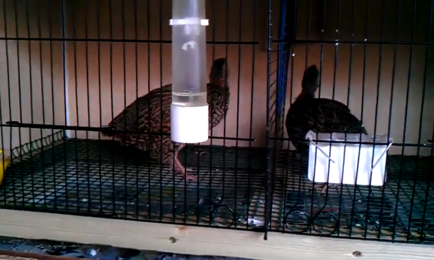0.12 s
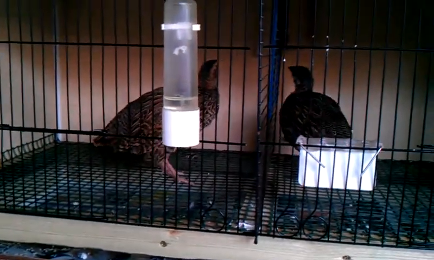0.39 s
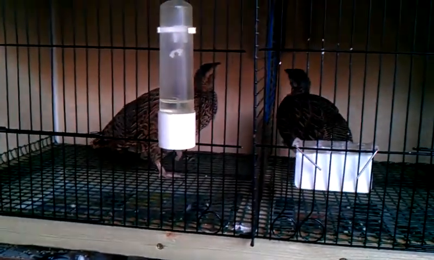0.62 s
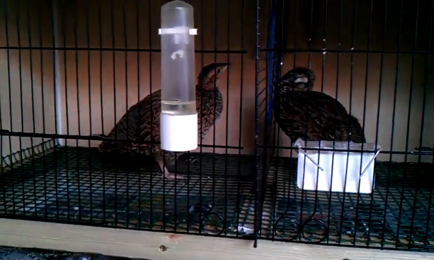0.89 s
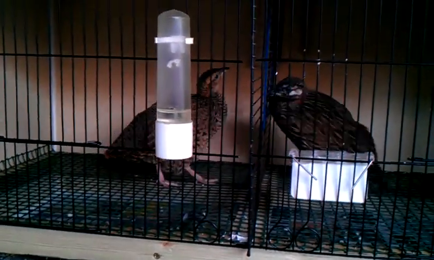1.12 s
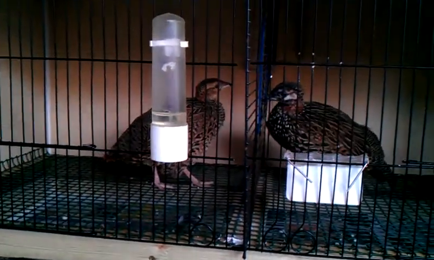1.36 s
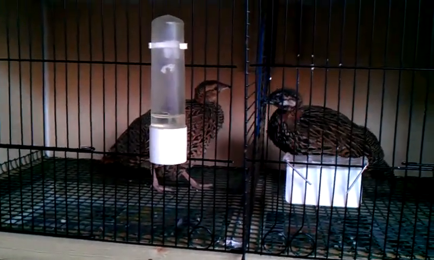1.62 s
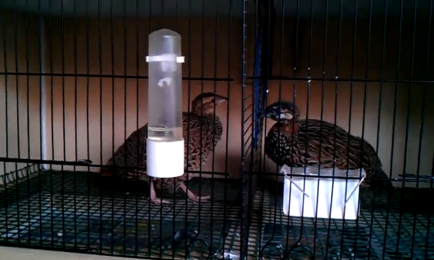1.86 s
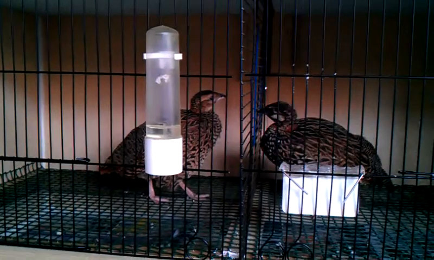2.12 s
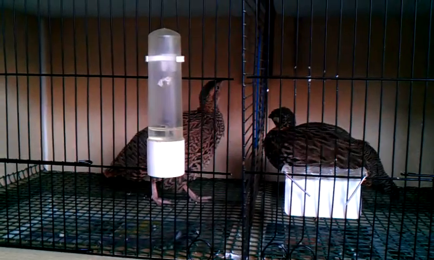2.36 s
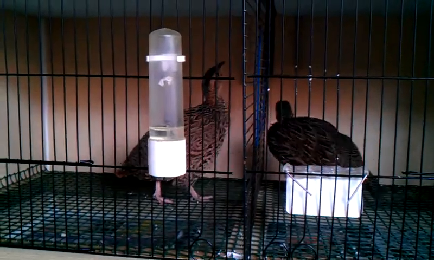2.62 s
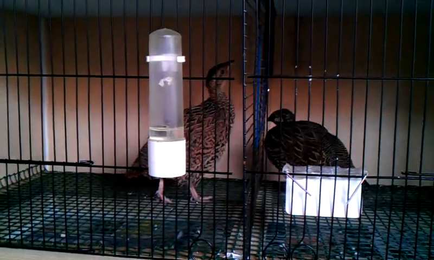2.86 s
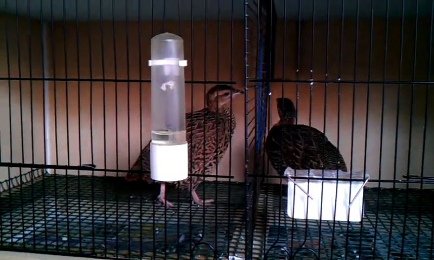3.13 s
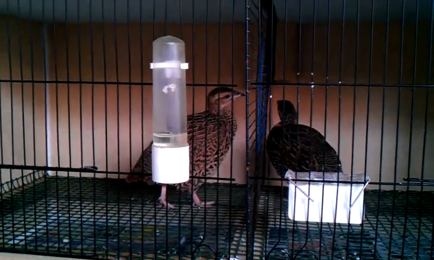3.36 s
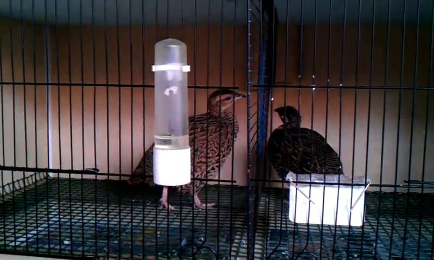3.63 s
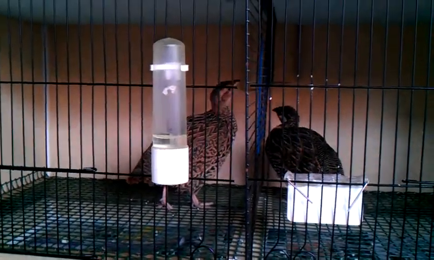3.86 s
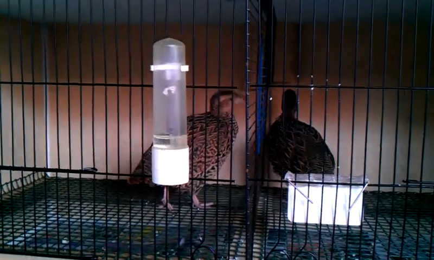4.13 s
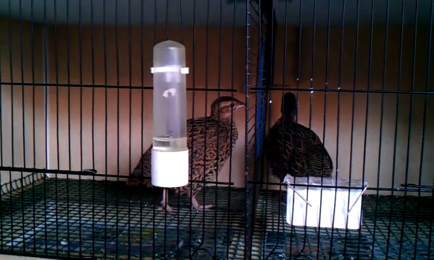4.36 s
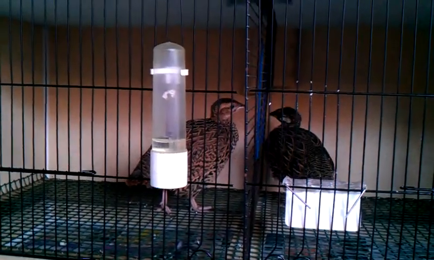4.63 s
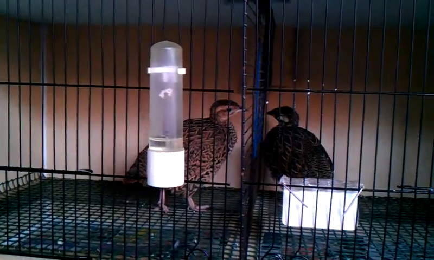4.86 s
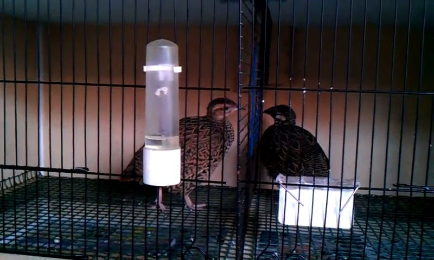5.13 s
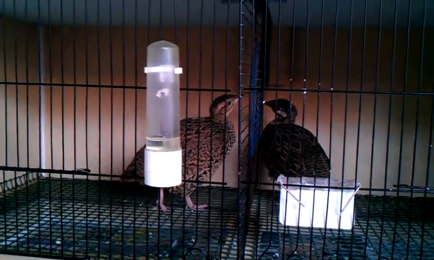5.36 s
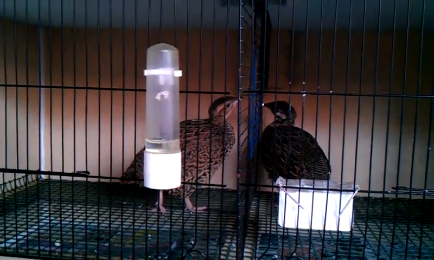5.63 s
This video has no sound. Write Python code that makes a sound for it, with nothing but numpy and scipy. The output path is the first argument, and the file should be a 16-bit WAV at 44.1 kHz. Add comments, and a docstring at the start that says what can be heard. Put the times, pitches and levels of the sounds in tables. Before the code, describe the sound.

Over faint steady room hush, feathers rustle and claws scratch mesh while a bird whimpers barely audibly. A short throaty whine leads into a loud, grating, fast rhythmic call, distorted at the input, interleaved with hoarse puffing clucks. Then near quiet returns, with a falling whimper, a few scratches, and wavering low whines at the end. Mono, close, small reverberant shed.

```python
"""A small wooden shed, with two game birds in a wire cage. One screams a rapid, rasping call, built from
fluttering partials and bursts of noise, that overloads the recorder's input; the other clucks in hoarse
puffs between phrases. Soft, mostly falling whimpers and wheezy peeps, also made of partials, come before
and after. Coloured noise gives the feathers, bodies and claws that rustle on the mesh, and the faint room."""
import sys
import numpy as np
from scipy import signal
from scipy.fft import rfft, irfft, next_fast_len
from scipy.io import wavfile
from scipy.ndimage import uniform_filter1d, map_coordinates

SR = 44100
rng = np.random.default_rng(int(sys.argv[2]) if len(sys.argv) > 2 else 0)


def store_pcm(level_fs):
    """Save levels as 16-bit WAV."""
    pcm = np.round(np.clip(level_fs, -1, 1) * 32767).astype(np.int16)
    wavfile.write(sys.argv[1], SR, np.atleast_2d(pcm).T)


def ratio_of_db(decibels):
    """Turn decibels (scalar or array-like) into linear amplitude factors; 0 dB maps to 1."""
    return 10 ** (np.asarray(decibels, float) / 20)


N = 253134
TIME = np.arange(N) / SR

# Toneless rasping while the throat breaks up. Each row: start and end in seconds, level in dB before
# the mix, beak resonance in Hz.
RASP_BURSTS = [(1.266, 1.354, -42, 8140), (1.515, 1.58, -20.5, 7800), (1.629, 1.733, -15.5, 7400),
               (1.747, 1.775, -8, 5100), (1.785, 1.84, -28.5, 4900), (1.923, 1.951, -26.5, 5150),
               (2.058, 2.139, -16.5, 8100), (2.194, 2.227, -14.5, 7160), (2.237, 2.342, -15.5, 5160),
               (2.361, 2.404, -23.5, 4840), (2.499, 2.547, -22, 5300), (2.617, 2.646, -24, 5300),
               (2.645, 2.718, -10.5, 7970), (2.763, 2.935, -14.5, 5370), (2.945, 3.005, -20.5, 4650),
               (3.102, 3.163, -22, 5200), (3.218, 3.248, -19.5, 5300), (3.248, 3.313, -11, 8140),
               (3.356, 3.419, -7, 6260), (3.467, 3.534, -21, 7200), (3.597, 3.683, -15, 4900),
               (3.665, 3.764, -19, 4680), (3.834, 3.921, -11.5, 7980), (3.956, 4.015, -15.5, 5940),
               (4.036, 4.101, -6, 7100), (4.14, 4.22, -26, 7100)]


def unit(x):
    """Scaled to rms 1."""
    return x / np.sqrt(np.mean(np.abs(x) ** 2) + 1e-20)


def along(points, hz):
    """Reads a curve of (Hz, value) points on a log frequency axis."""
    f, v = np.transpose(points)
    return np.interp(np.log(hz + 1), np.log(f + 1), v)


def wobble(rate, size):
    """A smooth random curve with rate knots a second."""
    knots = rng.standard_normal(int(size * rate / SR) + 4)
    return map_coordinates(knots, [np.arange(size) * rate / SR])


def noise(spectrum):
    """Noise of rms 1 with the given colour."""
    m = next_fast_len(N)
    white = rfft(rng.standard_normal(m))
    colour = ratio_of_db(along(spectrum, np.fft.rfftfreq(m, 1 / SR)))
    return unit(irfft(white * colour, m)[:N])


def gate(t, length, edge):
    """Opens at 0 and shuts at length, with soft edges (all in seconds)."""
    return np.sin(np.pi / 2 * np.clip(np.minimum(t, length - t) / edge, 0, 1)) ** 2


def add_voice(track, start, pitch, partials, jitter, rough, flutter_hz):
    """Adds partials {order: gain} on an unsteady pitch, each fluttering on its own, the higher ones more."""
    n = len(pitch)
    phase = 2 * np.pi * np.cumsum(pitch * (1 + jitter * wobble(flutter_hz, n))) / SR
    for k, gain in partials.items():
        # a complex flutter shakes both loudness and phase
        flutter = 1 + rough * k ** 0.25 * (wobble(flutter_hz, n) + 1j * wobble(flutter_hz, n))
        tone = np.exp(1j * (k * phase + rng.uniform(0, 2 * np.pi))) * flutter
        tone = tone * (k * pitch < SR / 3)  # no partials near the top of the band
        part = track[round(start * SR):][:n]
        part += (np.sqrt(2) * gain * tone.real)[:len(part)]


def effort(burst):
    """How hard one rasp sounds, sample by sample."""
    start, end, db, _ = burst
    return ratio_of_db(db) * gate(TIME - start + 0.0041, end - start + 0.01624, 0.017)


def screams():
    """Whistled notes, and two high overtones of low notes given rows of their own, torn up by any rasping
    under them; partials above the third fall away step by step."""
    # Notes, with overtones of lower notes in the rows that start near 3850 and 5810 Hz. Each row: start
    # and end in seconds, first and last pitch in Hz, level in dB before the mix.
    whistles = [(1.516, 1.56, 968, 985, -39.5), (1.519, 1.547, 3850, 3950, -27),
                (1.569, 1.609, 2390, 2418, -11), (1.603, 1.652, 2375, 2348, -16.5),
                (1.676, 1.725, 997.6, 963, -32.5), (1.732, 1.767, 1845, 1866, -1),
                (1.772, 1.804, 5810, 4800, -13), (1.787, 1.87, 1609, 1507, -18),
                (2.064, 2.11, 3546, 3570, -24), (2.125, 2.163, 2357, 2350, -13.5),
                (2.154, 2.23, 2354, 2333, -12), (2.257, 2.296, 937.5, 972, -31),
                (2.285, 2.381, 1872, 1870, -16.5), (2.356, 2.381, 2332, 2300, -9.5),
                (2.385, 2.441, 2263, 2230, -28), (2.4, 2.435, 1805, 1853, -22.5),
                (2.67, 2.696, 2388, 2370, -21), (2.704, 2.769, 2387, 2382, -14),
                (2.726, 2.807, 2972, 2960, -14.5), (2.853, 2.883, 2600, 2550, -32),
                (2.864, 2.894, 991, 1005, -31), (2.889, 2.936, 1881, 1903, -9.5),
                (2.935, 2.965, 2462, 2344, -14), (2.961, 3.028, 2358, 2234, -22),
                (3.284, 3.357, 2376, 2354, -15.5), (3.318, 3.405, 2966, 2952, -15),
                (3.406, 3.472, 2363, 2406, -9), (3.463, 3.544, 2424, 2386, -19),
                (3.593, 3.638, 2565, 2520, -31.5), (3.612, 3.639, 991, 991, -27),
                (3.643, 3.724, 1886, 1860, -12.5), (3.712, 3.755, 2347, 2198, -17.5),
                (3.755, 3.794, 1785, 1830, -25), (3.901, 3.952, 2340, 2412, -22.5),
                (3.914, 3.995, 2980, 2975, -17), (3.961, 3.992, 2347, 2374, -18),
                (4.023, 4.059, 2080, 2205, -22.5), (4.081, 4.154, 2356, 2428, -2),
                (4.156, 4.212, 2433, 2383, -24.5)]
    # Overtones of a held pitch. Each row: pitch in Hz, 2nd partial in dB, 3rd partial in dB.
    registers = [(1024, 8.5, 3), (1600, -24.5, -22.5), (1908, 3, -2), (2080, 7.5, 7.5), (2300, 2, -10.5),
                 (2358, -6, -5.5), (2600, 13, 1), (2980, 2, -4.5), (3750, 0.5, -18), (5570, -19.5, -32)]
    sag_db = 8  # gain of the 2nd partial for each octave a second of falling pitch
    fade_db = 71  # loss of the 2nd partial per second along a row
    brighten = 0.19  # dB of overtone per dB of level over -13
    out = np.zeros(N)
    rasping = sum(map(effort, RASP_BURSTS))
    pitches, *overtones = np.transpose(registers)
    for start, end, hz, last_hz, db in whistles:
        t = np.arange(round((end - start + 0.0108) * SR)) / SR
        sag = np.clip(np.log2(hz / last_hz) / (end - start), 0, 1.5)  # octaves a second
        second_db, third_db = [np.interp(hz, pitches, v) + brighten * (db + 13) for v in overtones]
        levels = [0, second_db + sag_db * sag - fade_db * t, third_db]
        levels += [third_db - 7.5 - 1.5 * k for k in range(7)]
        shape = ratio_of_db(db) * gate(t, t[-1], 0.014)
        gains = {k + 1: shape * ratio_of_db(v) for k, v in enumerate(levels)}
        under = rasping[round(start * SR):][:len(t)]
        torn = .18 + .85 * (hz < 1700) + under / (under + ratio_of_db(-22))  # low notes are rougher too
        waver = 1 + .003 * wobble(45, len(t))  # the pitch drifts about its line
        pitch = waver * np.linspace(hz, last_hz, len(t))
        add_voice(out, start - .004, pitch, gains, .009 * torn, .85 * torn, 220)
    return out


def rasps():
    """Broken voice: noise in quick uneven bursts, each rasp with its own beak resonance."""
    # Colour of the breath. Each row: frequency in Hz, relative level in dB per Hz.
    breath = [(180, -37.5), (300, -66.5), (877, -16.5), (1490, -3.5), (1700, -2), (5850, -3),
              (15500, -13.5)]
    bursts = ratio_of_db(3.2 * wobble(260, N) + 1.1 * wobble(60, N))
    hz, t, z = signal.stft(noise(breath) * bursts, SR, nperseg=256)
    frames = np.clip((t * SR).astype(int), 0, N - 1)
    colour = 0
    for burst in RASP_BURSTS:
        resonance = 1 + ratio_of_db(6.5) / (1 + ((hz - burst[3]) / 700) ** 2)
        colour = colour + np.outer(resonance, effort(burst)[frames])
    # the rasp comes in clumps of pitch and time
    patches = uniform_filter1d(rng.standard_normal(z.shape), size=3, axis=0)
    patches = uniform_filter1d(patches, size=9, axis=1)
    colour = colour * ratio_of_db(4.5 * unit(patches))
    return signal.istft(z * colour, SR, nperseg=256)[1][:N] * ratio_of_db(-4.5)


def clucks():
    """Hoarse puffs; the first, at 1.322 s, is the roughness of a whimper. Each is made of pulses so uneven
    that their partials smear, picked out by the throat."""
    # Clucks, after a first row that roughens a whimper. Each row: start in seconds, length in seconds
    # before it dies away, level in dB before the trim at the end, throat resonance in Hz.
    puffs = [(1.322, 0.046, -31, 1281), (1.918, 0.058, -17, 1519), (1.943, 0.03, -19, 1181),
             (2.029, 0.03, -16, 1252), (2.38, 0.046, -20, 1592), (2.495, 0.022, -16, 1801),
             (2.507, 0.056, -15.5, 1497), (2.615, 0.043, -15, 1413), (2.986, 0.038, -20, 1542),
             (3.098, 0.025, -14, 1727), (3.12, 0.053, -15, 1542), (3.212, 0.041, -13.5, 1656),
             (3.513, 0.024, -16, 1432), (3.732, 0.043, -20.5, 1530), (3.873, 0.028, -18, 1512),
             (3.98, 0.035, -16, 1312), (4.167, 0.049, -21, 1233), (4.296, 0.034, -16.5, 1320),
             (4.393, 0.045, -27.5, 1190)]
    # Further resonances of a puff. Each row: centre in Hz, width in Hz, level in dB against the throat.
    upper = [(1305, 370, -12.5), (2395, 570, -20), (5300, 3700, -29.5), (9980, 4000, -40)]
    out = np.zeros(N)
    for start, length, db, throat_hz in puffs:
        t = np.arange(round(2 * length * SR)) / SR
        dying = ratio_of_db(-25 * np.maximum(t / length - 1, 0))
        shape = ratio_of_db(db) * gate(t + 0.0015, t[-1], 0.02) * dying
        peaks = [(throat_hz, 430, 0)] + upper
        hz = throat_hz / 4  # the fourth partial sits in the throat
        gains = {}
        for k in range(1, 40):
            gains[k] = shape * sum(ratio_of_db(d) / (1 + ((k * hz - c) / w) ** 2) ** 2 for c, w, d in peaks)
        add_voice(out, start, hz * (1.06 - 1.3 * t), gains, .035, .9, 260)
    return out * ratio_of_db(-5.0)


def whimpers():
    """Soft glides through throat and beak, hoarser when loud."""
    # Each row: 2nd partial in dB, higher partials in dB, then the glide as points of time in seconds,
    # pitch in Hz and level in dB ahead of the throat and beak colour.
    glides = [(-23, -37, [(.63, 810, -59), (.75, 724, -52), (.79, 710, -69)]), (2.5, -6, [(.757, 1455, -48),
              (.775, 1202, -52), (.8, 995, -53), (.86, 902, -52), (.915, 807, -56)]),
              (6, -18, [(1.0, 1122, -62), (1.042, 1010, -55), (1.075, 1030, -60)]),
              (4, -10, [(1.25, 709, -32.5), (1.272, 644, -31), (1.32, 752, -23.5), (1.36, 680, -36)]),
              (11.5, -30, [(1.295, 559, -47), (1.345, 531, -38), (1.39, 495, -45)]),
              (8, -23.5, [(1.39, 454, -46.5), (1.45, 391, -40.5), (1.51, 383, -49)]),
              (2, -12, [(4.64, 1377, -65), (4.7, 1000, -47), (4.76, 756, -43), (4.825, 570, -51)]),
              (-3, -16.5, [(5.345, 518, -44), (5.378, 569, -28.5), (5.43, 654, -47)]),
              (-15.5, -18, [(5.38, 874, -37), (5.43, 870, -30), (5.51, 849, -28), (5.54, 763, -28),
              (5.57, 645, -32.5), (5.605, 557, -24), (5.625, 633, -45)]), (3.5, -21, [(5.565, 628.5, -44),
              (5.61, 541, -40), (5.66, 499, -37.5), (5.7, 434, -40.5), (5.74, 386, -36.5)])]
    # Colour of partials 1 and 2. Each row: frequency in Hz, gain in dB.
    throat = [(350, -5.5), (550, -8), (800, -2.5), (1400, -9.5), (2000, -15.5), (2900, -14)]
    # Colour of the higher partials. Each row: frequency in Hz, gain in dB.
    beak = [(1100, 12), (1800, 10.5), (2700, -5.5), (3500, -12), (4400, -2.5), (6500, -4.5), (8500, -1),
            (11000, -33)]
    dull_db = 2.5  # loss of the higher partials for each octave a second of glide
    out = np.zeros(N)
    for second_db, higher_db, points in glides:
        s, *cols = np.transpose(points)
        t = np.arange(s[0], s[-1], 1 / SR)
        hz, db = [np.interp(t, s, c) for c in cols]
        glide = uniform_filter1d(np.abs(np.gradient(np.log2(hz))) * SR, size=600)  # octaves a second
        levels = [along(throat, hz), along(throat, 2 * hz) + second_db]
        levels += [along(beak, k * hz) + higher_db - dull_db * glide for k in range(3, 13)]
        shape = gate(t - s[0], s[-1] - s[0], 0.0016)
        gains = {k + 1: ratio_of_db(db + v) * shape for k, v in enumerate(levels)}
        hoarse = 0.45 + ratio_of_db(db + 10)
        add_voice(out, s[0], hz, gains, .009, hoarse, 130)
    return out


def peeps():
    """Wheezy peeps: two partials on a straight glide, blurred by deep flutter."""
    # Each row: start and end in seconds, first and last pitch in Hz, level in dB.
    calls = [(0, 0.112, 1900, 1875, -68), (0.288, 0.556, 1607, 1768, -61.5),
             (0.956, 0.995, 2010, 1800, -58), (1.293, 1.329, 1355, 1447, -29),
             (5.593, 5.666, 806, 778, -41), (5.601, 5.721, 1344, 1220, -53)]
    out = np.zeros(N)
    for start, end, hz, last_hz, db in calls:
        t = np.arange(round((end - start) * SR)) / SR
        gains = {k: ratio_of_db(db - 12 * (k - 1)) * gate(t, t[-1], .002) for k in (1, 2)}
        add_voice(out, start, np.linspace(hz, last_hz, len(t)), gains, .02, .9, 180)
    return out


def rustle():
    """Movement makes feathers hiss and, less steeply, bodies scuffle; claws scratch in short dying bursts."""
    # How much the birds move. Each row: time in seconds, level in dB.
    movement = [(0, -56.5), (.08, -62.5), (.14, -74), (.28, -71), (.42, -52.5), (.6, -62), (.78, -61.5),
                (.9, -55.5), (1.24, -53.5), (4.5, -49), (4.7, -49.5), (4.84, -59.5), (4.97, -57.5),
                (5.04, -74), (5.34, -68.5), (5.47, -54), (5.5, -45.5), (5.58, -51), (5.74, -56.5)]
    # Colours of feathers, bodies and mesh. Each row: frequency in Hz, relative level in dB per Hz.
    feathers = [(880, -58), (1500, -15), (2250, -17.5), (2500, -18.5), (4940, -9), (6710, -18),
                (7850, -6.5), (15800, -32)]
    bodies = [(18, -46.5), (30, 10), (292, -5.5), (386, -2.5), (2500, -12), (3250, -14.5), (5500, -120)]
    mesh = [(180, -45), (300, -10), (1400, -13), (2480, -15.5), (8460, -10.5), (15000, -26.5)]
    # Claws on mesh. Each row: start in seconds, level in dB, time to fall 60 dB in seconds.
    scratches = [(0.073, -49.5, 0.12), (.262, -51, 0.022), (0.414, -52, 0.063), (.513, -63, 0.054),
                 (0.575, -50, 0.11), (.688, -45.5, 0.028), (0.855, -42.5, 0.14), (.922, -47.5, 0.16),
                 (1.032, -46.5, 0.12), (1.098, -45.5, 0.31), (1.124, -43.5, 0.31), (1.232, -43.5, 0.29),
                 (4.864, -46.5, 0.14), (4.911, -47, 0.079), (5.068, -53.5, 0.11), (5.106, -38, 0.27),
                 (5.322, -49, 0.026)]
    moving_db = np.interp(TIME, *np.transpose(movement))
    hiss = ratio_of_db(moving_db + 1.6 * wobble(66, N)) * noise(feathers)
    scuffle_db = -57 + 0.34 * (moving_db + 55.5)
    scuffle = ratio_of_db(scuffle_db + 0.42 * wobble(35, N)) * noise(bodies)
    claws = np.zeros(N)
    for start, db, t60 in scratches:
        claws += ratio_of_db(db - 60 * np.abs(TIME - start) / t60) * gate(TIME - start, 1, 0.00087)
    return hiss + scuffle + claws * ratio_of_db(0.9 * wobble(560, N)) * noise(mesh)


def shed(x):
    """Echo off the walls: a noise tail in which each frequency dies at its own speed."""
    # Each row: frequency in Hz, time to fall 60 dB in seconds.
    decay = [(300, 0.42), (1500, 0.21), (5000, 0.18), (12000, 0.18)]
    hz, t, z = signal.stft(rng.standard_normal(SR // 2), SR, nperseg=256)
    tail = signal.istft(z * ratio_of_db(-60 * t / along(decay, hz)[:, None]), SR, nperseg=256)[1]
    delayed = np.pad(x, (150, 0))  # samples before the echo starts
    return signal.fftconvolve(delayed, tail / np.linalg.norm(tail))[:N]


def room_noise():
    """Faint, steady coloured noise under everything."""
    # Each row: frequency in Hz, relative level in dB per Hz.
    hush = [(12, -34.5), (20, 16), (228, -4), (446, -22), (558, -8), (2750, -20), (16000, -13)]
    return ratio_of_db(-58.5) * noise(hush)


def scene():
    """Birds with their echoes, rustle and room noise."""
    loud = ratio_of_db(3.0) * (screams() + rasps())
    soft = clucks() + whimpers() + peeps()
    echo = shed(ratio_of_db(-8.5) * loud + ratio_of_db(-11.0) * soft)
    return (loud + soft + echo + rustle() + room_noise())[None]


def low_pass(x):
    """Removes everything above the highest recorded frequency."""
    return signal.sosfilt(signal.butter(12, 16150, fs=SR, output="sos"), x)


def record(dry):
    """The input clips, a little earlier on one side, which also makes low rumble; a fast gain control then
    holds the loudness down, and bass and top treble are cut."""
    top = np.where(dry > 0, .52, .38)
    clipped = dry / (1 + np.abs(dry / top) ** 6) ** (1 / 6)
    power = signal.lfilter([.004], [1, -.996], clipped ** 2)  # averaged over some 6 ms
    limit = ratio_of_db(-35.0)  # mean square, an rms of -17.5 dB
    held = clipped / (1 + (power / limit) ** 2) ** (1 / 4)
    hz = np.fft.rfftfreq(N, 1 / SR)
    bass_cut = hz / np.hypot(hz, 150)
    treble_cut = ratio_of_db(-5 * (hz > 9700)) * (hz < 15850)
    finished = irfft(rfft(held) * bass_cut * treble_cut, N)
    return low_pass(finished)


dry = scene()
out = record(dry)
store_pcm(out)
```